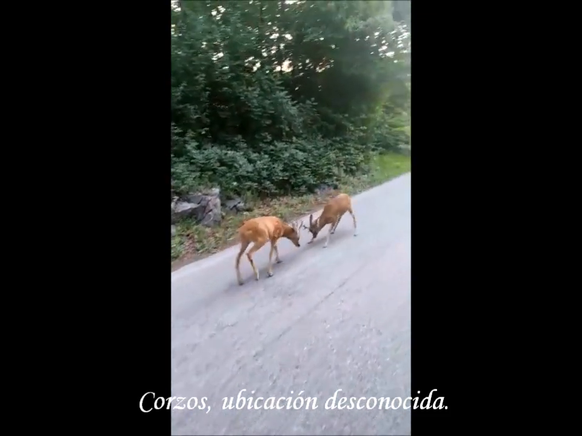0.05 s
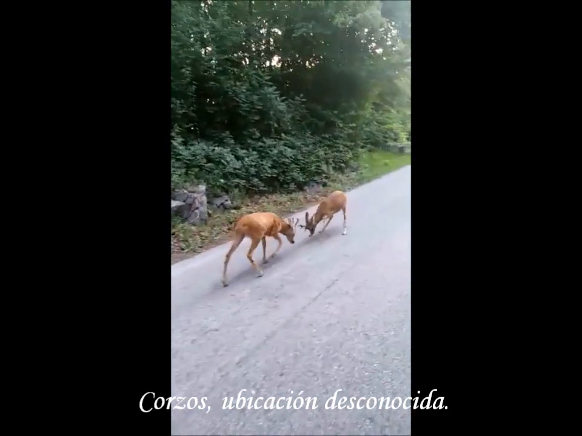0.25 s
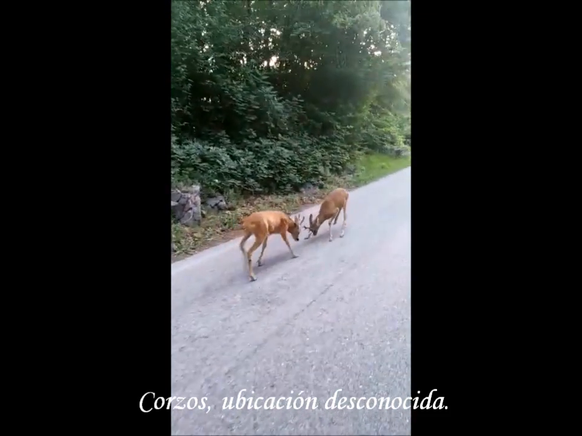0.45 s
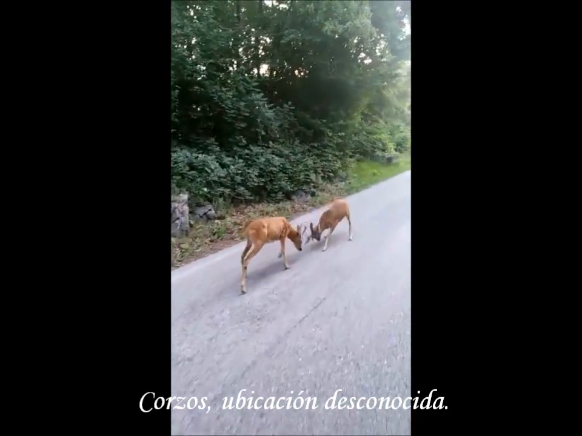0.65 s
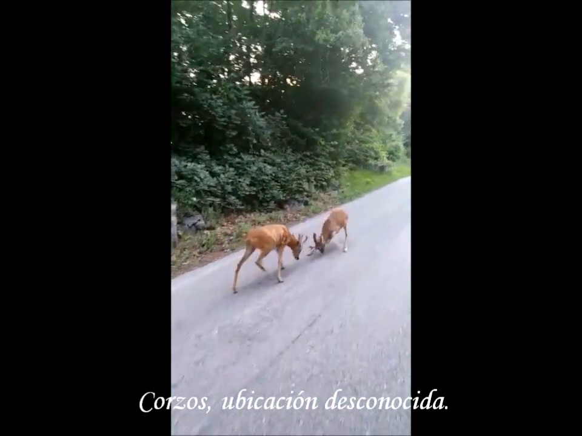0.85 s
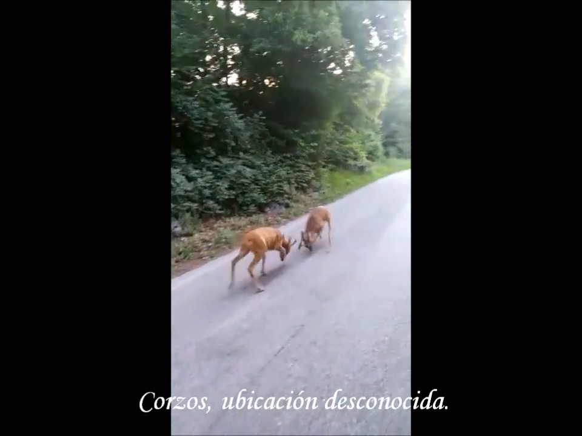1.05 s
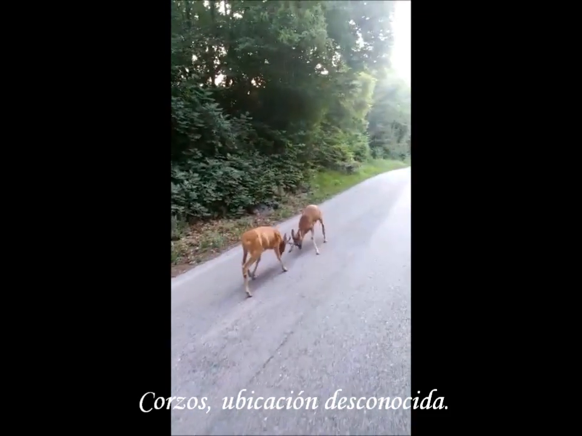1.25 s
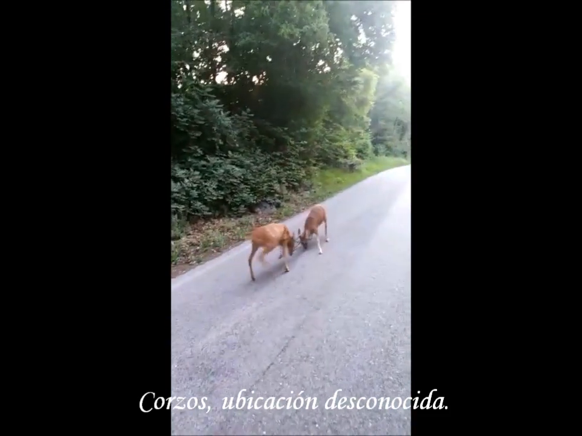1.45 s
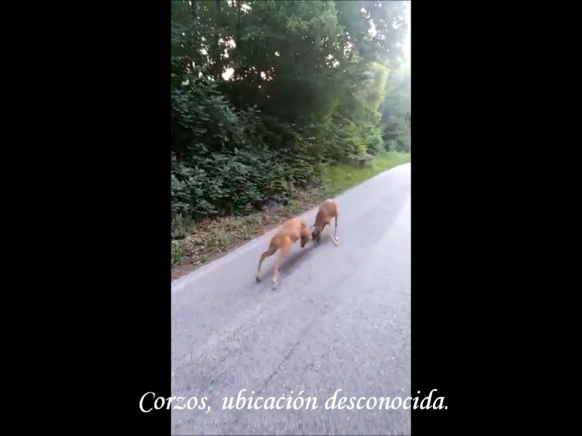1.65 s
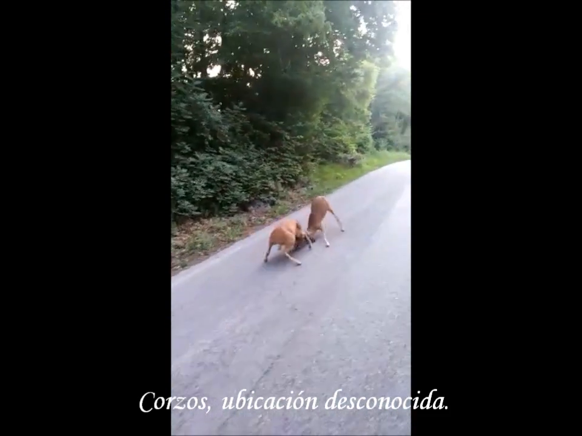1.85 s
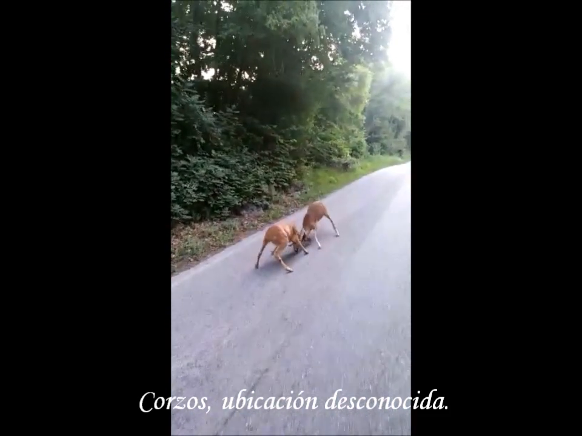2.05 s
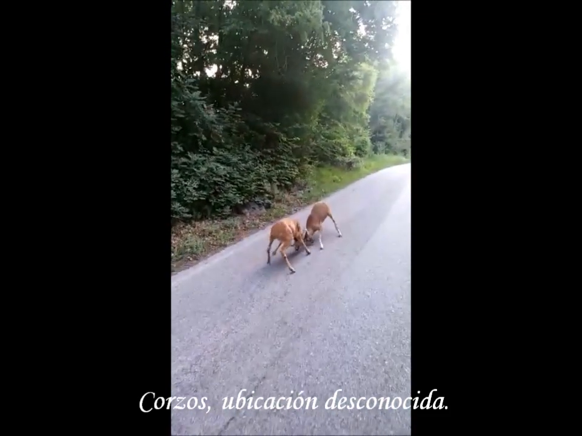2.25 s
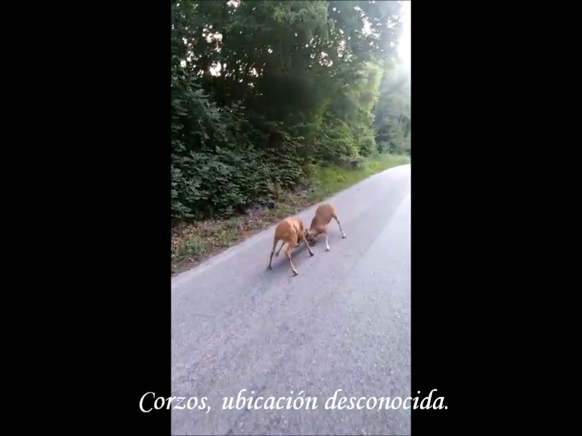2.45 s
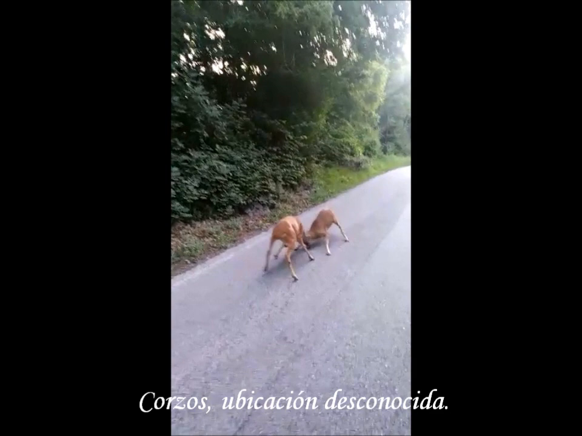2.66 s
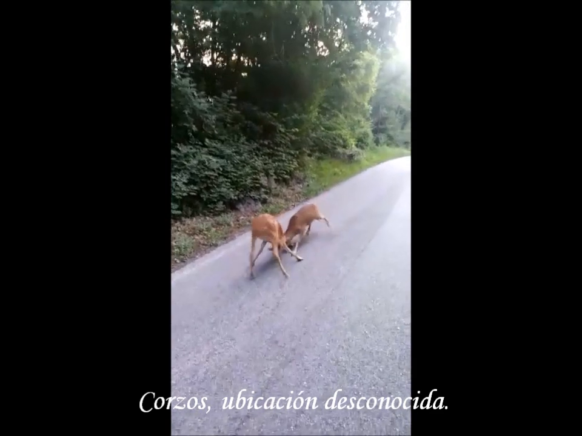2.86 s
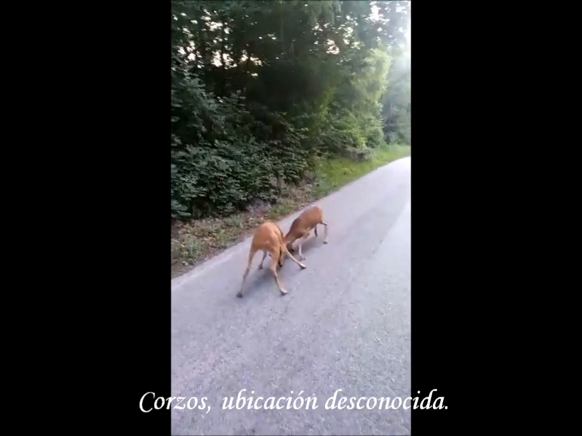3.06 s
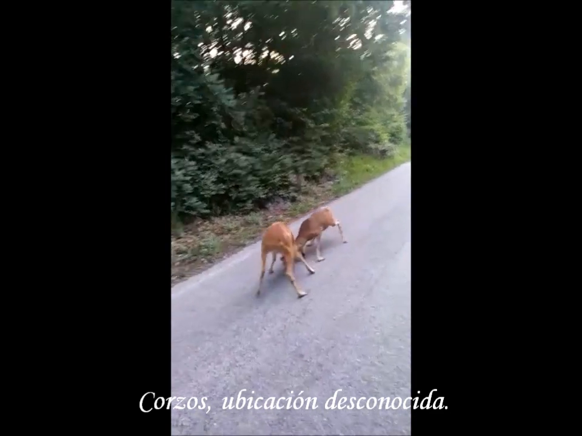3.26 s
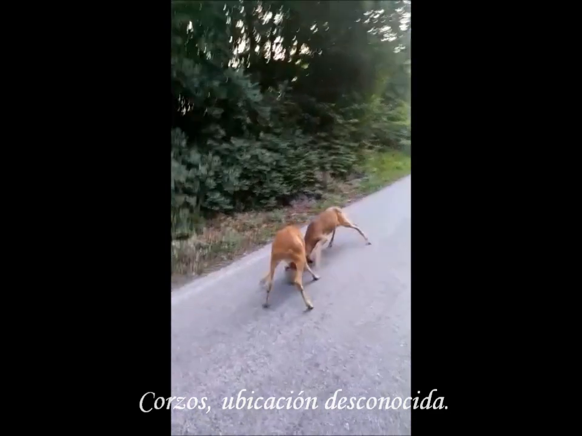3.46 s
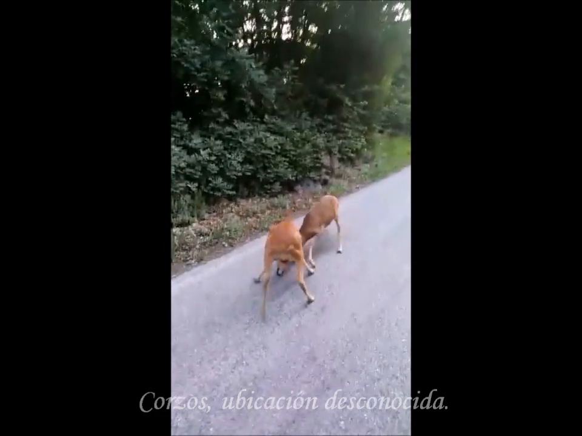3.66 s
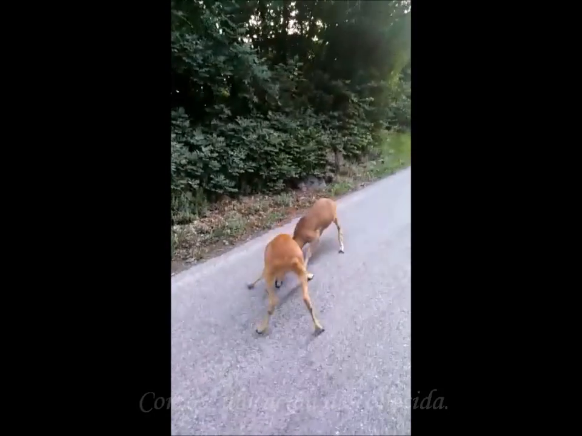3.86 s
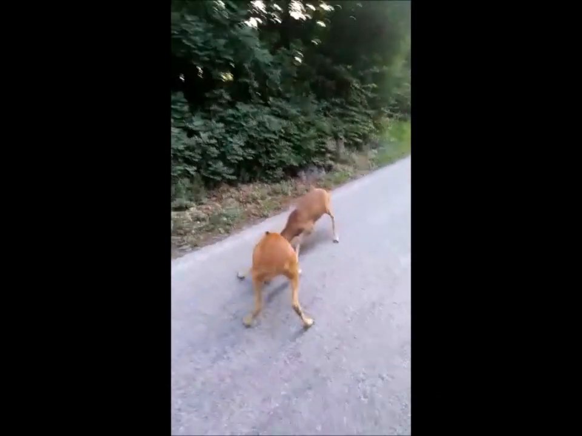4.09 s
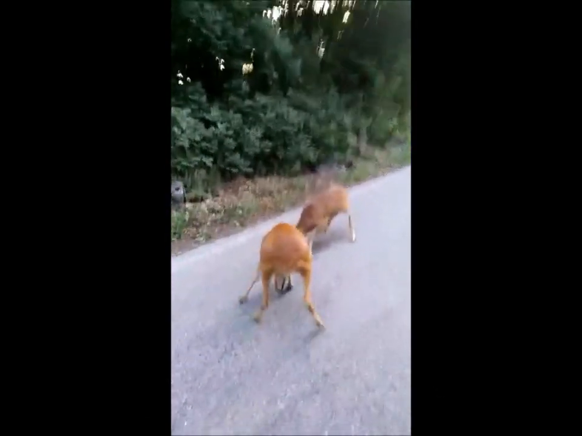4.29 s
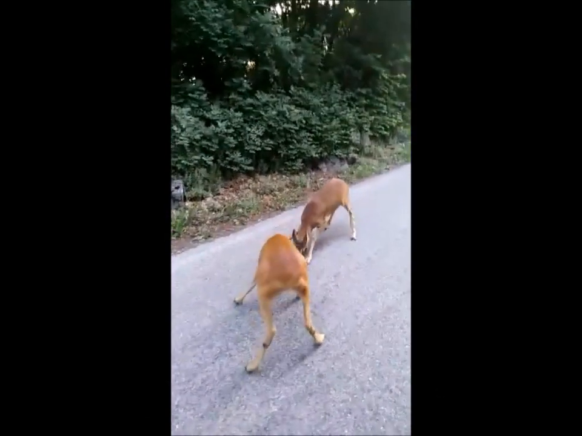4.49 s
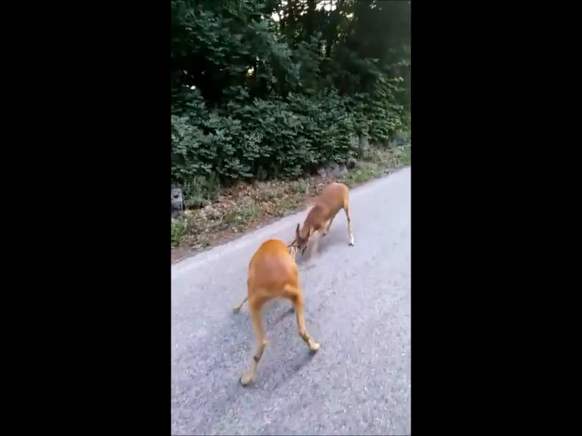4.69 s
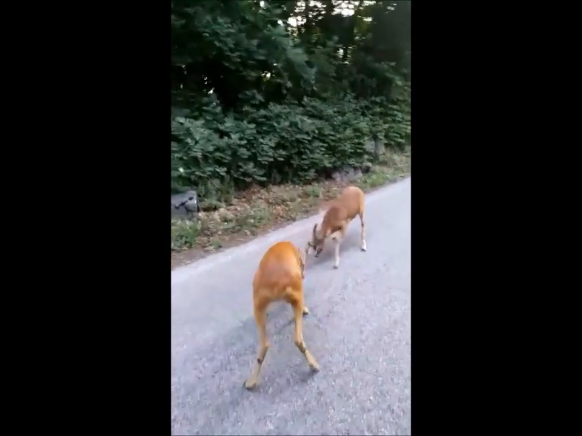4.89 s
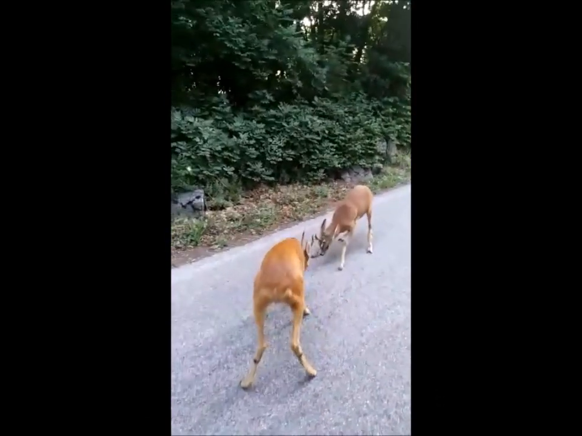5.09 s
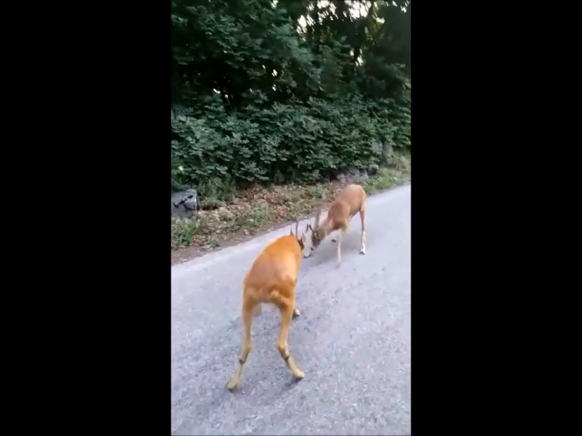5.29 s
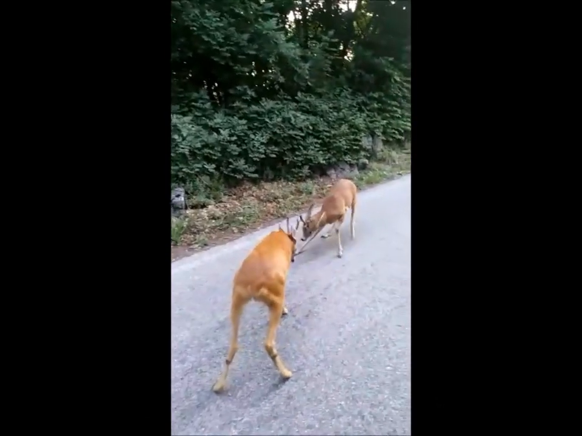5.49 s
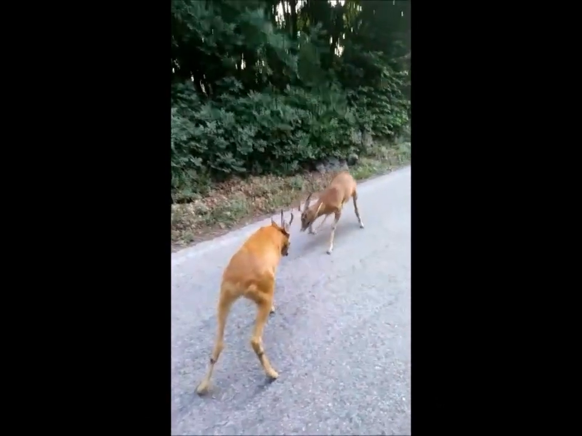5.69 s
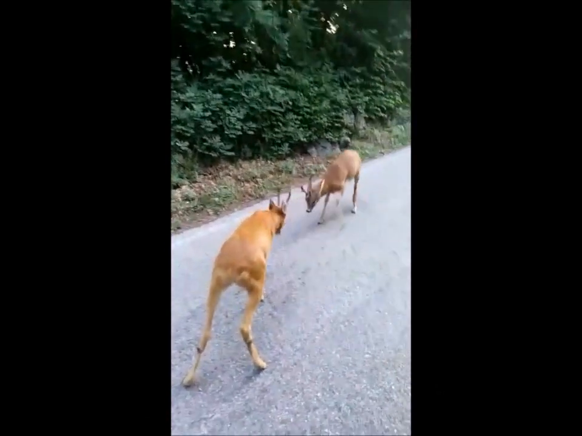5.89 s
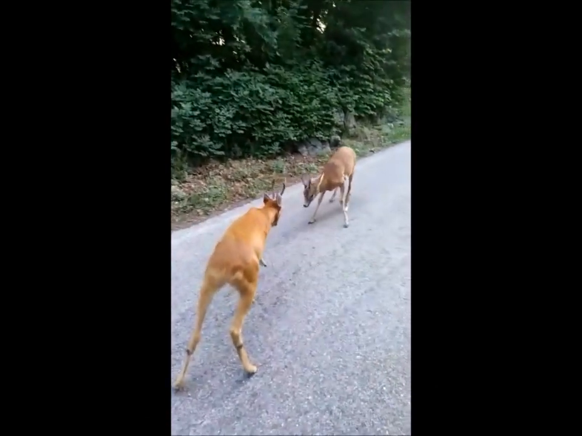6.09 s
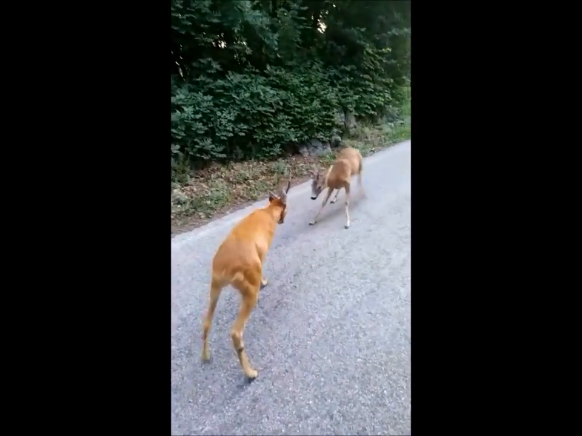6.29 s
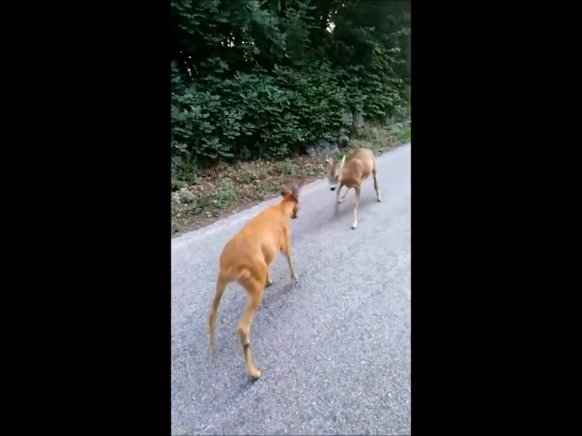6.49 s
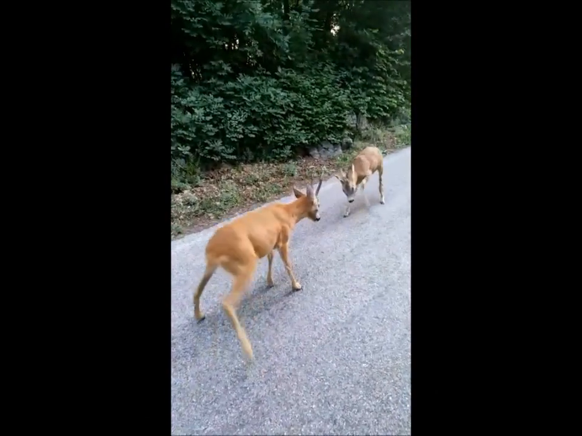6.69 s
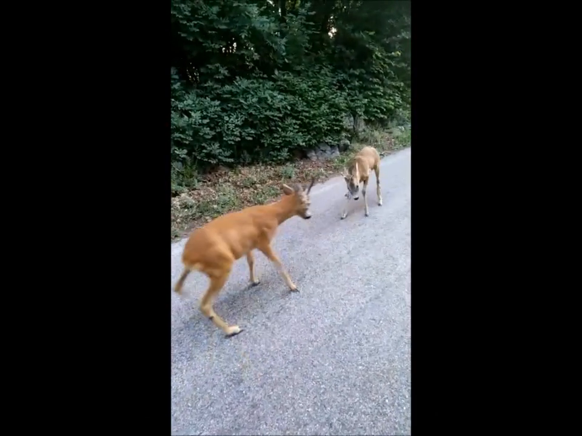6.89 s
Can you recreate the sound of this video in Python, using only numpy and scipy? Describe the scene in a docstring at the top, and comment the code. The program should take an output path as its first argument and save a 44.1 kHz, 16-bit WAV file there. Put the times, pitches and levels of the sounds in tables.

```python
"""A faint woodland hiss over low wind, then dry clicks: two small deer spar on a paved road near a phone.
Antler tines and hooves click in irregular runs, as noise bursts through a bone colour with short rings.
Grains of noise make the scrapes, low noise puffs the hoof-falls and a bright noise band the slide.
Hedge and road add a short tail; wind rumble and a narrow swelling hiss lie behind.
The phone's noise suppressor opens band by band on sounds above its quiet level and closes slowly."""
import sys
import numpy as np
from scipy import signal
from scipy.fft import rfft, irfft
from scipy.io import wavfile
from scipy.ndimage import uniform_filter1d, map_coordinates

SR = 44100
rng = np.random.default_rng(int(sys.argv[2]) if len(sys.argv) > 2 else 0)


def output_pcm(signal):
    """Save a mono or channel-first signal as 16-bit PCM at the path in sys.argv[1].

    Samples are clipped to [-1, 1] before scaling.
    """
    pcm = np.clip(np.atleast_2d(signal).T, -1, 1) * 32767
    wavfile.write(sys.argv[1], SR, np.round(pcm).astype(np.int16))


def invert_db(level):
    """Linear amplitude ratio for a level in decibels (20 dB per decade), elementwise."""
    return 10 ** (np.asarray(level, dtype=float) / 20)


N = 306054  # length in samples

# All source levels are as set ahead of the microphone and its suppressor.
# Beam strikes beam, or a hoof lands hard: time_s, click_db, knock_db (sharp click, hollow knock)
CLASHES = [(1.2494, -18.5, -32), (1.4104, -26.5, -36.5), (1.5347, -2, -15.5), (1.5472, -13.5, -21.5),
           (1.6103, -11, -26.5), (1.6417, -18.5, -25), (1.6482, -15, -13), (1.6579, -4, -7.5),
           (1.688, -2.5, -25.5), (1.6958, -3, -16), (1.9014, -31, -22.5), (1.9764, -8, -28.5),
           (2.0707, -47.5, -26.5), (2.1724, -23.5, -33), (2.38, -20, -30.5), (2.4868, -17, -28.5),
           (2.5022, -40, -26.5), (2.6729, -49.5, -26), (2.6824, -17.5, -25), (2.765, -30, -26.5),
           (2.8232, -5.5, -29), (2.966, -12, -23.5), (3.0239, -17, -19.5), (3.1435, -18.5, -23.5),
           (3.2432, -37, -25.5), (3.4535, -5.5, -24.5), (3.4656, 1.5, -22), (3.5598, -14, -28),
           (3.722, 0.5, -19.5), (3.7353, -15, -27), (3.7895, -10, -22.5), (4.2114, -9, -31),
           (4.2173, -11.5, -28.5), (4.2247, -18, -27.5), (4.315, -36, -30), (4.4078, -10, -25),
           (4.8845, -11, -41), (5.65, -30, -37.5), (5.99, -35, -38), (6.8184, -24, -31)]
# Tine tips glance off each other: time_s, click_db
TICKS = [(0.2636, -22), (0.4071, -24), (0.526, -25), (0.5961, -22.5), (0.6269, -25), (0.7733, -20.5),
         (0.9626, -21.5), (0.977, -20), (1.052, -23), (1.099, -26), (1.1823, -22), (1.2008, -15.5),
         (1.3286, -26.5), (1.5308, -15), (1.5361, -0.5), (1.5491, -14.5), (1.6126, -16), (1.651, -2),
         (1.656, 0), (1.6615, -12), (1.7121, -2), (1.714, -6.5), (1.7158, -6), (1.7282, -9), (1.753, -11),
         (1.7623, -3), (1.7815, -3), (1.7872, -17), (1.7957, -12), (1.8033, -4), (1.8643, -6),
         (1.8807, -22), (1.9158, -16), (1.9355, -11), (2.1564, -21.5), (2.3278, -26.5), (2.3348, -23.5),
         (2.4989, -10), (2.6664, -16), (2.6781, -9), (2.735, -15), (2.7419, -11.5), (2.7813, -11.5),
         (2.8113, -18), (2.853, -14), (2.8559, -21), (2.973, -26), (2.989, -18), (3.017, -24), (3.052, -25),
         (3.0677, -20), (3.1253, -14.5), (3.1688, -23), (3.1833, -12), (3.188, -14.5), (3.193, -19),
         (3.1957, -17), (3.2303, -22), (3.3193, -19.5), (3.382, -36), (3.4411, -9), (3.443, -11.5),
         (3.449, -11.5), (3.4566, -13), (3.4681, -3), (3.475, -13), (3.4832, -6), (3.4956, -11),
         (3.5081, -3.5), (3.5258, -13.5), (3.5291, -12), (3.5312, -9), (3.5402, -19), (3.561, -10),
         (3.6697, -10), (3.684, -17), (3.6921, -13), (3.7586, -19), (3.797, -19), (3.8185, -7),
         (3.8255, -16), (3.8372, -9), (3.8526, -16), (3.856, -10.5), (3.8798, -21), (3.948, -17.5),
         (3.9538, -22), (3.958, -19), (3.9697, -9.5), (3.9827, -15.5), (4.032, -18.5), (4.0431, -12),
         (4.0495, -26), (4.1527, -17), (4.163, -16), (4.2206, -9.5), (4.3209, -15), (4.412, -16),
         (4.4147, -14.5), (4.4677, -14.5), (4.491, -34), (4.5013, -14.5), (4.7479, -22), (4.8317, -20.5),
         (4.8551, -18), (5.1577, -24.5), (5.6005, -18.5), (5.6357, -30.5), (5.7153, -22.5), (5.796, -22.5),
         (6.0449, -24), (6.1448, -23), (6.1615, -25), (6.258, -22.5), (6.488, -28), (6.7154, -27.5),
         (6.8066, -22.5), (6.8559, -24)]
TICK_KNOCK_DB = -19.5  # a tip carries little body under its click
# Colour of bone through the small microphone port: pitch_hz, relative_level_db (per Hz)
BONE_COLOUR = [(120, -45.5), (200, -7.5), (254, -2), (380, -13.5), (635, -3), (1060, -10), (1300, -5),
               (1680, -10), (1940, -8.5), (2750, -11.5), (5150, -2), (6760, -21), (8420, -16.5),
               (9930, -31.5), (16000, -32.5)]
# Ringing modes of a struck antler: pitch_hz, relative_level_db, t60_s (time to fall 60 dB)
ANTLER_MODES = [(644, -14, 0.041), (1370, -1.5, 0.03), (1930, -2, 0.027), (2720, -8, 0.016)]
RING_DB, RING_SCATTER_DB = -7, 4  # ring against knock; each blow lands elsewhere on the beam
# Strokes of bone on bone or hoof on road: start_s, length_s, gritty_scrape_db, dull_scuff_db
STROKES = [(.415, 0.22, -61.5, -56), (.975, 0.28, -47.5, -53.5), (1.42, 0.079, -51.5, -62.5),
           (1.7, 0.09, -23, -33.5), (1.865, 0.032, -31, -38.5), (1.96, 0.062, -41, -46),
           (2.658, 0.02, -33, -34), (2.75, 0.087, -55, -60), (2.84, 0.03, -35, -44),
           (2.985, 0.061, -36, -43), (3.165, 0.019, -32.5, -41), (3.23, 0.1, -40.5, -50.5),
           (3.345, 0.042, -38, -45), (3.465, 0.091, -24.5, -32), (3.62, 0.057, -37, -43.5),
           (3.75, 0.12, -36, -46), (3.95, 0.18, -42.5, -48.5), (4.135, 0.014, -31.5, -40),
           (4.28, 0.064, -49, -46.5), (4.408, 0.089, -41, -46), (4.55, 0.4, -49, -55),
           (5.165, 0.014, -49.5, -48), (5.515, 0.0067, -83, -58.5), (5.605, 0.031, -42, -59),
           (5.8, 0.26, -52, -88), (6.14, 0.14, -50.5, -54.5), (6.43, 0.052, -44.5, -58),
           (6.8, 0.17, -47, -54.5)]
STROKE_RISE_DB_S, SCRAPE_FALL_DB_S, SCUFF_FALL_DB_S = 4003.5, 206, 283
GRAINS_PER_S, BUSY_DB = 450, -33.5  # a stroke at BUSY_DB doubles the number of grains
# Soft hoof-falls on the road: time_s, level_db (before the soft attack lowers the peak)
HOOF_FALLS = [(0.859, -43.5), (1.439, -38), (2.501, -35), (2.675, -24.5), (3.131, -31.5), (3.869, -36),
              (4.162, -29.5), (6.231, -30)]
HOOF_BAND_HZ, HOOF_ATTACK_S, HOOF_T60_S = (85, 330), 0.01, 0.077
# Smooth bright hiss, as of a hoof sliding: start_s, length_s, level_db
SLIDES = [(4.27, 0.44, -53)]
# Colour of the woodland hiss: pitch_hz, relative_level_db (per Hz)
WOOD_COLOUR = [(250, -17.5), (650, -11), (1050, -19), (1320, -11.5), (1650, -11.5), (2600, -8),
               (4700, -3.5), (7000, -17), (8300, -13.5), (10500, -23.5)]
# Level of the woodland hiss as heard, which dips briefly twice: time_s, level_db
WOOD_LEVEL = [(2.17, -51), (2.3, -57), (2.33, -51.5), (6.53, -51), (6.62, -55.5), (6.75, -49)]
# Colour of the wind rumble: pitch_hz, relative_level_db (per Hz)
WIND_COLOUR = [(15, -74), (38, -7), (92, 8), (184, -4), (310, -1.5), (400, -25.5), (520, -12), (880, -120)]
# The slowly rising and falling breeze under the puffs: time_s, level_db
BREEZE = [(0, -60.5), (.5, -79), (1.2, -65.5), (3.7, -49), (4.7, -65.5), (6.94, -59.5)]
# Puffs of wind and handling bumps: start_s, length_s, rumble_db
PUFFS = [(.73, 0.017, -61), (.86, 0.022, -46.5), (1.04, 0.12, -61.5), (1.44, 0.0098, -50),
         (1.71, 0.058, -34.5), (2.43, 0.071, -48), (2.6, 0.16, -54), (3.0, 0.12, -63), (3.5, 0.019, -46),
         (4.2, 0.065, -51.5), (4.97, 0.23, -49.5), (5.75, 0.39, -67), (6.23, 0.077, -66.5)]
PUFF_RISE_DB_S, PUFF_FALL_DB_S = 246, 157.5
# A narrow hiss that swells near 1.35 kHz: time_s, level_db
NARROW_LEVEL = [(5.2, -83), (5.38, -59), (5.55, -74), (5.75, -59), (6.1, -64), (6.3, -51), (6.6, -63.5),
                (6.94, -58)]
# The phone's suppressor: pitch_hz, closed_depth_db, opening_rise_db (rise above the quiet level)
SUPPRESSOR = [(138, -2.5, 21), (298, 30, 2.5), (2640, 18.5, 5), (3530, 11.5, 0), (5340, 38, -4),
              (6780, 20.5, 9.5)]
MIC_TOP_HZ = 12700


def unit(x):
    """Scale to rms 1."""
    return x / np.sqrt(np.mean(x ** 2) + 1e-20)


def along(points, hz):
    """Interpolate (Hz, value) points on a log-frequency axis."""
    f, v = np.transpose(points)
    return np.interp(np.log(hz + 1), np.log(f + 1), v)


def curve(rows):
    """One value per sample from (s, value) points."""
    s, value = np.transpose(rows)
    return np.interp(np.arange(N) / SR, s, value)


def wobble(rate):
    """A smooth random curve, rate knots a second."""
    knots = rng.standard_normal(int(N * rate / SR) + 4)
    return map_coordinates(knots, [np.arange(N) * rate / SR])


def response(spectrum, size=2048):
    """Causal, minimum-phase impulse response with the given colour, by way of the cepstrum."""
    level_db = along(spectrum, np.fft.rfftfreq(size, 1 / SR))
    cepstrum = irfft(np.log(invert_db(level_db) + 1e-6))
    cepstrum[1:size // 2] *= 2
    cepstrum[size // 2 + 1:] = 0
    return irfft(np.exp(rfft(cepstrum)))


def band(x, lo_hz, hi_hz):
    """Causal band-pass."""
    return signal.sosfilt(signal.butter(2, [lo_hz, hi_hz], "bandpass", fs=SR, output="sos"), x)


def through(x, h):
    """x played through the response h."""
    return signal.fftconvolve(x, h)[:N]


def patchy(x, depth_db, bins, frames):
    """Makes x uneven band by band: each narrow band varies in level at its own pace."""
    z = signal.stft(x, nperseg=512)[2]
    field = uniform_filter1d(rng.standard_normal(z.shape), size=bins, axis=0)
    field = uniform_filter1d(field, size=frames, axis=1)
    return signal.istft(z * invert_db(depth_db * unit(field)), nperseg=512)[1][:N]


def swells(rows, column, rise_db_s, fall_db_s):
    """Each row rises, holds for its length and falls; overlapping swells add in power."""
    rows, t = np.array(rows), np.arange(0, N + 64, 64) / SR
    start, length = rows[:, :1], rows[:, 1:2]
    early, late = start - t, t - start - length
    db = rows[:, column, None] - rise_db_s * np.maximum(early, 0) - fall_db_s * np.maximum(late, 0)
    return np.interp(np.arange(N) / SR, t, np.sqrt(np.sum(invert_db(db) ** 2, axis=0)))


def contact_burst(t, lead):
    """A light first touch, a sharp blow at sample lead and a few ms of chatter, for click and knock."""
    chatter = rng.standard_normal((2, len(t))) * rng.exponential(size=len(t))  # spiky micro-impacts
    burst = np.roll(invert_db(-22 - 60 * t / 0.011) * chatter, lead, axis=1)
    burst[:, lead] = np.sign(chatter[0, 0])
    # each contact has its own brightness
    burst[:, lead + 1:lead + 3] += 0.28 * rng.standard_normal((2, 2))
    burst /= np.linalg.norm(burst[:, lead:lead + 3], axis=1, keepdims=True)
    burst[:, rng.integers(lead)] += 0.37 * chatter[:, 1]  # first touch, within the ms before
    return burst


def antler_ring(t):
    """A struck antler sounds decaying sine modes, scattered in level and pitch from blow to blow."""
    hz, mode_db, t60 = np.transpose(ANTLER_MODES)[..., None]
    scatter, detune = rng.standard_normal((2, len(ANTLER_MODES), 1))
    decay = invert_db(mode_db + RING_SCATTER_DB * scatter - 60 * t / t60)
    return (decay * np.sin(2 * np.pi * hz * (1 + 0.054 * detune) * t)).sum(axis=0)


def contacts():
    """Each contact drives bright and hollow bone responses with a burst; the antler rings briefly."""
    t, lead = np.arange(SR // 40) / SR, SR // 1000
    bone = response(BONE_COLOUR)
    voices = [band(bone, 2700, 8800), band(bone, 350, 2300)]  # click, knock
    trains, rings = np.zeros((2, N + len(t))), np.zeros(N + len(t))
    for s, click_db, knock_db in CLASHES + [(s, db, db + TICK_KNOCK_DB) for s, db in TICKS]:
        at = round(s * SR)
        trains[:, at - lead:at - lead + len(t)] += invert_db([[click_db], [knock_db]]) * contact_burst(t, lead)
        rings[at:at + len(t)] += invert_db(knock_db + RING_DB) * antler_ring(t)
    out = rings[:N]
    for train, h in zip(trains, voices):
        peak = np.abs(signal.hilbert(h)).max()
        out = out + through(train, h / peak)
    return out


def scrape():
    """Rough bone and grit give clumped grains of uneven size over a thin hiss; harder strokes crowd them."""
    pressure = swells(STROKES, 2, STROKE_RISE_DB_S, SCRAPE_FALL_DB_S)
    scuff = swells(STROKES, 3, STROKE_RISE_DB_S, SCUFF_FALL_DB_S)
    crowd = 1 + pressure / invert_db(BUSY_DB)
    hit = (rng.random((2, N)) < GRAINS_PER_S * crowd / SR) / np.sqrt(crowd)  # crowding adds no power
    size_db = 2.4 * np.minimum(rng.exponential(size=(2, N)), 2.2)
    grains = unit(hit * rng.standard_normal((2, N)) * invert_db(size_db))
    grit = grains + [[.5], [.9]] * rng.standard_normal((2, N))
    grit = grit * invert_db(2.5 * wobble(110) + .8 * wobble(30))
    grit = [patchy(g, 2.4, bins=10, frames=6) for g in grit]  # the colour shifts as the contact moves
    bone = response(BONE_COLOUR)
    gritty = unit(through(grit[0], band(bone, 2800, 16000)))
    dull = unit(through(grit[1], band(bone, 120, 2460)))
    return pressure * gritty + scuff * dull


def hoof_falls():
    """Each soft fall on the road is a low puff of noise that dies fast."""
    rows = np.array(HOOF_FALLS)
    since = np.maximum(np.arange(N) / SR - rows[:, :1], 0)
    shape = invert_db(rows[:, 1:] - 60 * since / HOOF_T60_S) * (1 - np.exp(-since / HOOF_ATTACK_S))
    return shape.sum(axis=0) * unit(band(rng.standard_normal(N), *HOOF_BAND_HZ))


def slide():
    """A sliding hoof hisses high and evenly."""
    hiss = unit(band(band(rng.standard_normal(N), 5900, 9600), 7600, 8570))
    return swells(SLIDES, 2, rise_db_s=297, fall_db_s=150.0) * hiss


def verge(x):
    """Hedge and road scatter a short diffuse tail, from 4 ms on."""
    t = np.arange(SR // 4) / SR
    tail = rng.standard_normal(len(t)) * invert_db(-60 * t / 0.27) * (t > .004)
    return through(x, tail / np.linalg.norm(tail))


def woodland_hiss():
    """Noise of the woodland's colour as heard on the phone, uneven band by band."""
    uneven = patchy(rng.standard_normal(N), 2.4, bins=3, frames=40)
    return invert_db(curve(WOOD_LEVEL)) * unit(through(uneven, response(WOOD_COLOUR)))


def wind_rumble():
    """Lumpy low noise: a breeze with puffs and handling bumps over it."""
    wind = through(rng.standard_normal(N), response(WIND_COLOUR, size=8192))
    strength = invert_db(curve(BREEZE)) + swells(PUFFS, 2, PUFF_RISE_DB_S, PUFF_FALL_DB_S)
    return strength * unit(wind * invert_db(3.6 * wobble(16)))


def narrow_hiss():
    """A narrow band of noise that swells and wavers."""
    narrow = unit(band(rng.standard_normal(N), 1265, 1426))
    return invert_db(curve(NARROW_LEVEL) + 1.8 * wobble(6.8)) * narrow


def scene():
    """Deer close by, their scatter off the verge, and the air behind."""
    deer = contacts() + scrape() + hoof_falls() + slide()
    air = woodland_hiss() + wind_rumble() + narrow_hiss()
    return (deer + invert_db(-12.0) * verge(deer) + air)[None]


def suppress(x, knee_db, fall_db_s):
    """Each narrow band opens while its held level tops its quiet level; loud hits keep it open longer."""
    hz, t, z = signal.stft(x, SR, nperseg=512, noverlap=384)
    power = uniform_filter1d(uniform_filter1d(np.abs(z) ** 2, size=2, axis=0), size=3, axis=1)
    level = 10 * np.log10(np.abs(power) + 1e-20)
    # hold each peak, letting it fall at fall_db_s
    held = np.maximum.accumulate(level + fall_db_s * t, axis=1) - fall_db_s * t
    quiet = uniform_filter1d(np.percentile(held, 8, axis=1, keepdims=True), size=5, axis=0)
    depth_db, open_db = (along(np.array(SUPPRESSOR)[:, [0, k]], hz)[:, None] for k in (1, 2))
    above = (held - quiet - open_db) / knee_db
    gain_db = -depth_db / (1 + np.exp(np.minimum(above, 50)))
    return signal.istft(z * invert_db(gain_db), SR, nperseg=512, noverlap=384)[1][:N]


def band_limit(x):
    """A steep low-pass at the top of the band."""
    return signal.sosfilt(signal.butter(12, 16520, fs=SR, output="sos"), x)


def record(dry):
    """The phone: microphone roll-off, noise suppressor, then a very faint flat noise floor."""
    heard = signal.sosfilt(signal.butter(2, MIC_TOP_HZ, fs=SR, output="sos"), dry[0])
    suppressed = suppress(heard, knee_db=1.5, fall_db_s=98.5)
    noise_floor = invert_db(-86.0) * unit(band(rng.standard_normal(N), 60, 12000))
    mix = (suppressed + noise_floor)[None]
    return band_limit(mix)


dry = scene()
out = record(dry)
output_pcm(out)
```